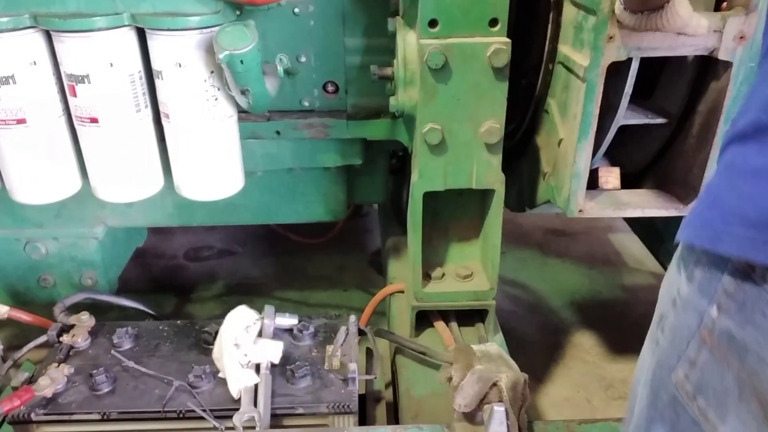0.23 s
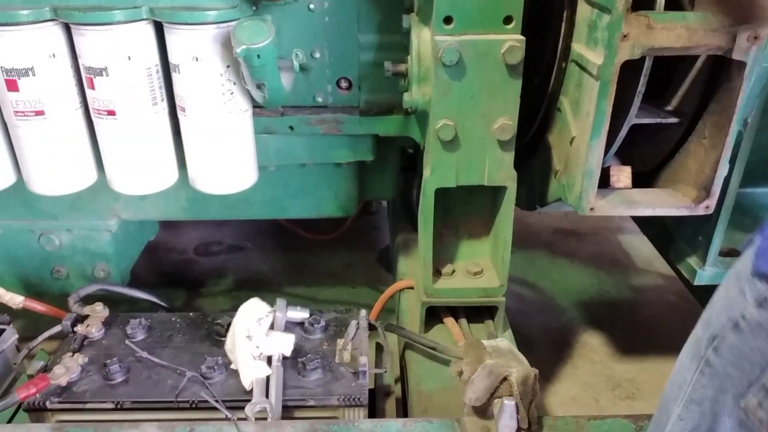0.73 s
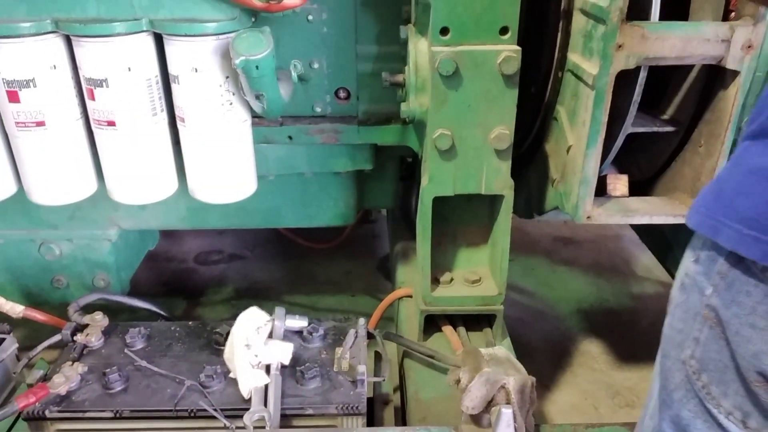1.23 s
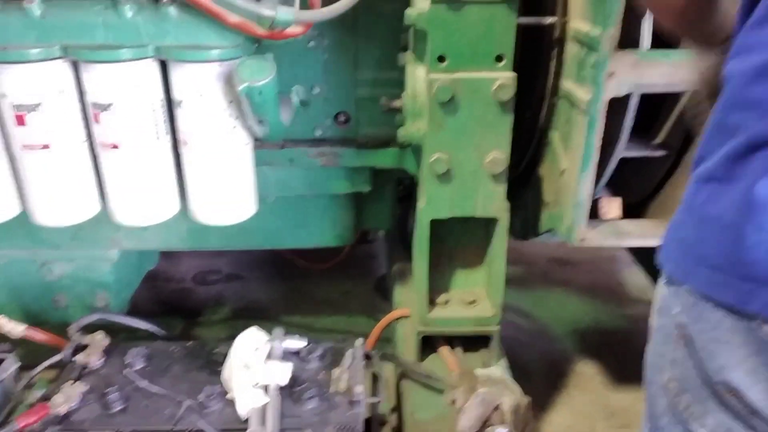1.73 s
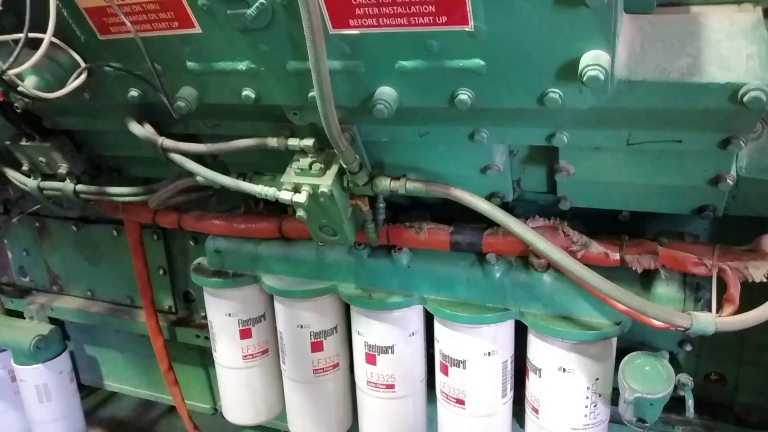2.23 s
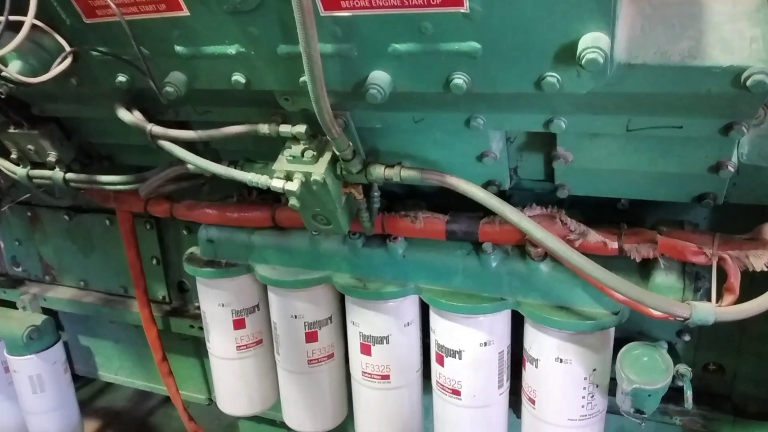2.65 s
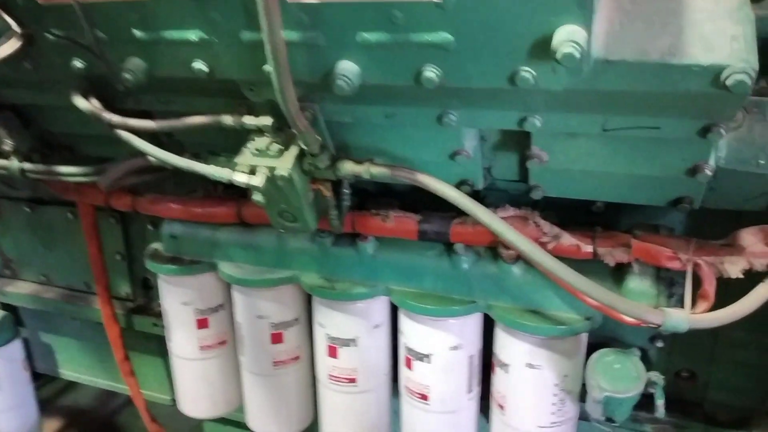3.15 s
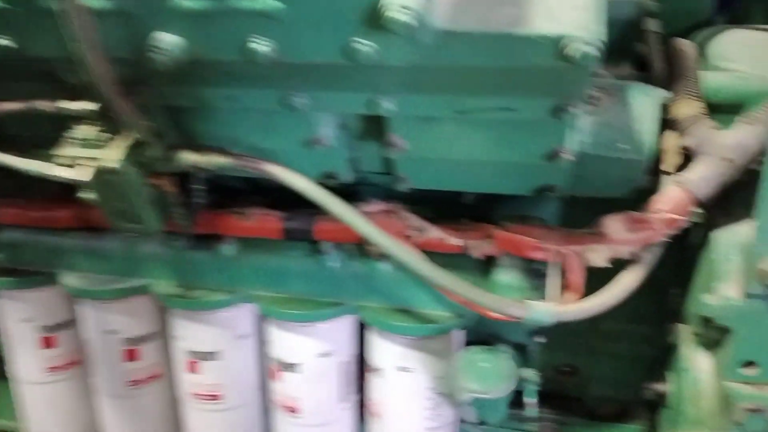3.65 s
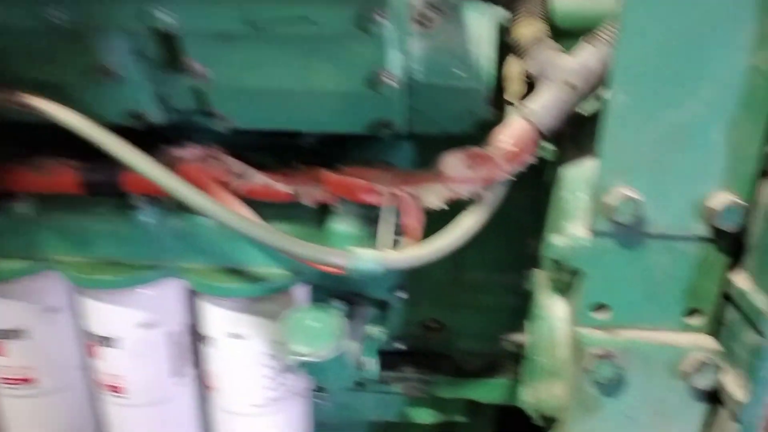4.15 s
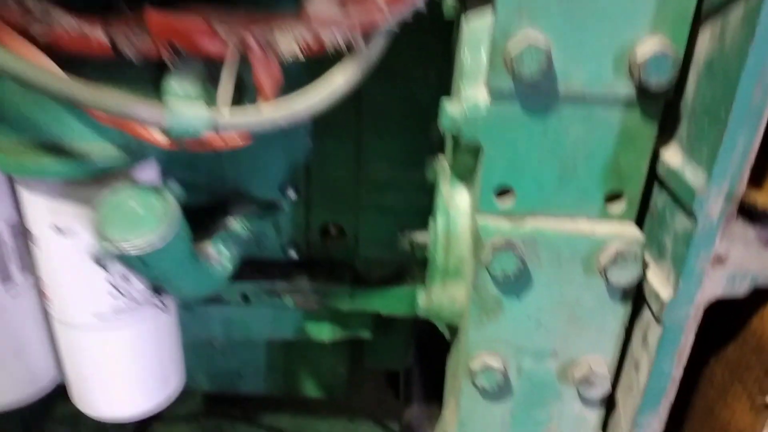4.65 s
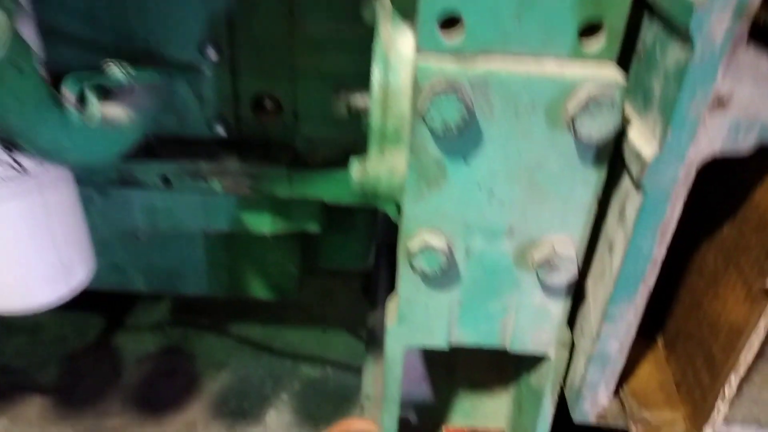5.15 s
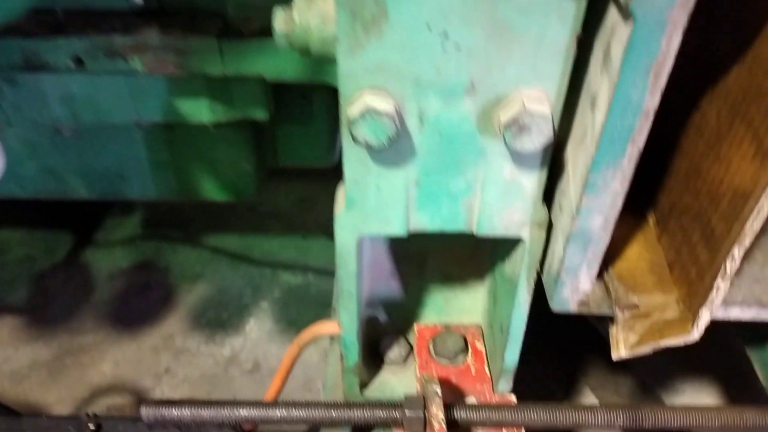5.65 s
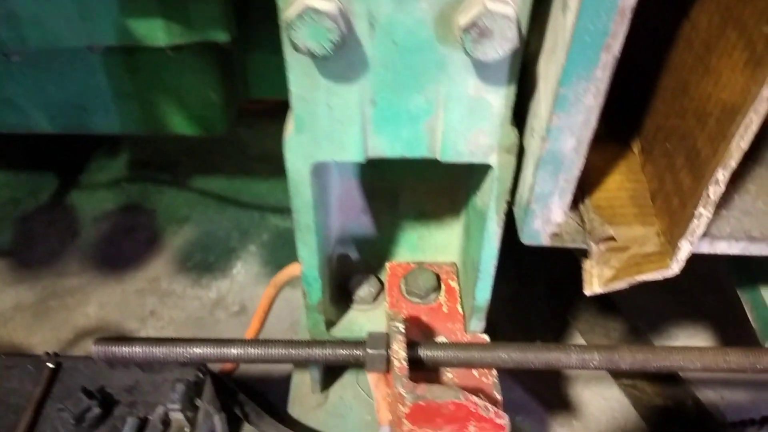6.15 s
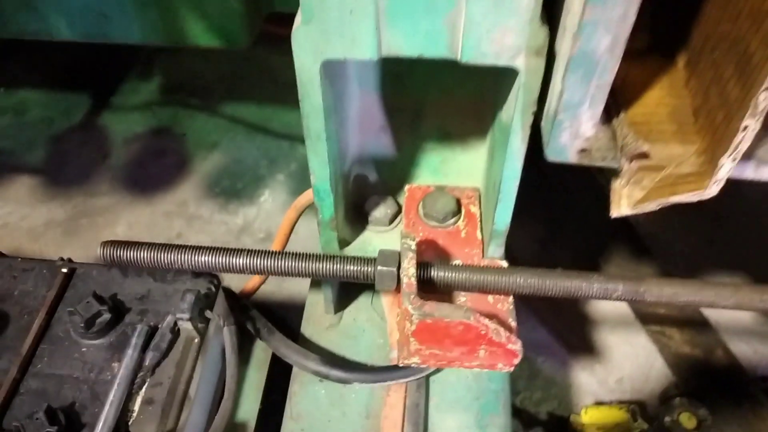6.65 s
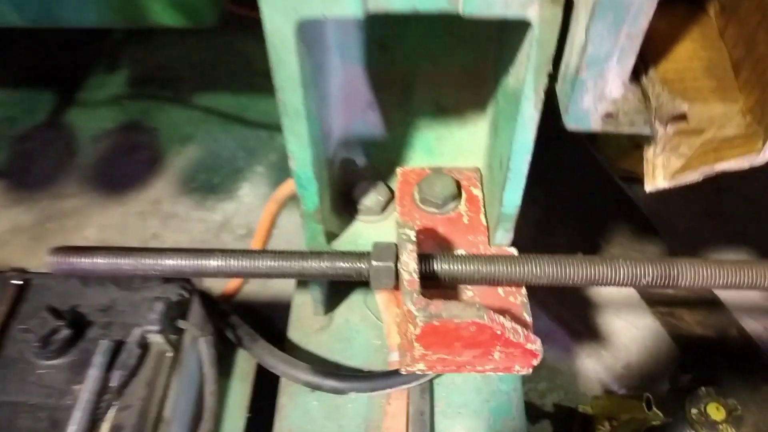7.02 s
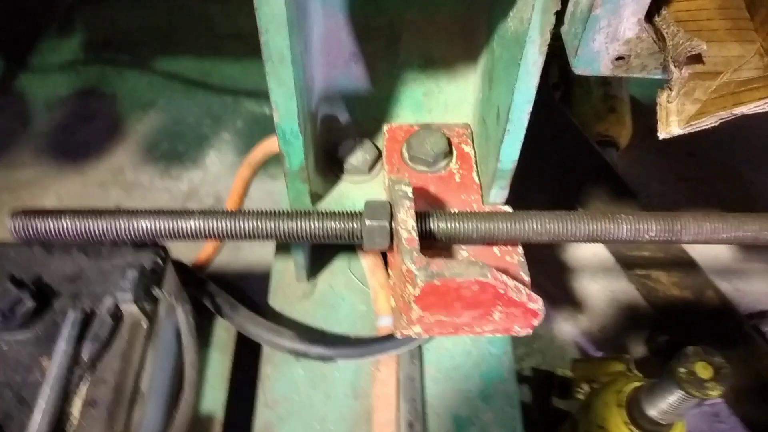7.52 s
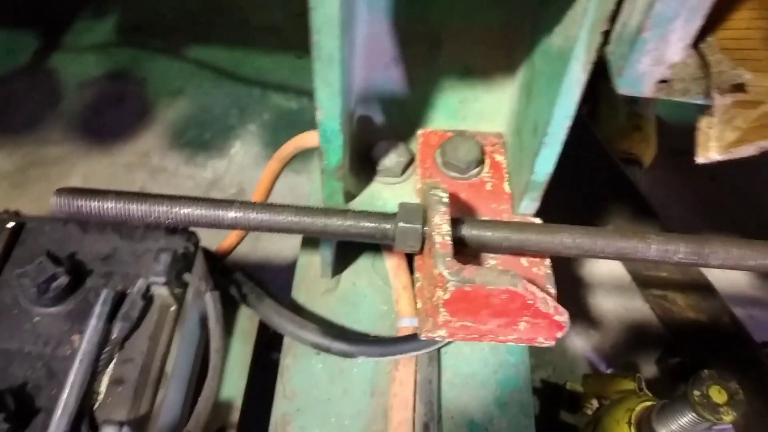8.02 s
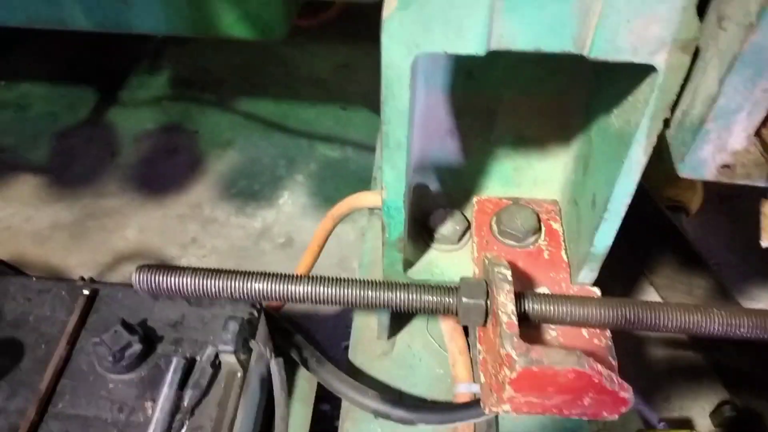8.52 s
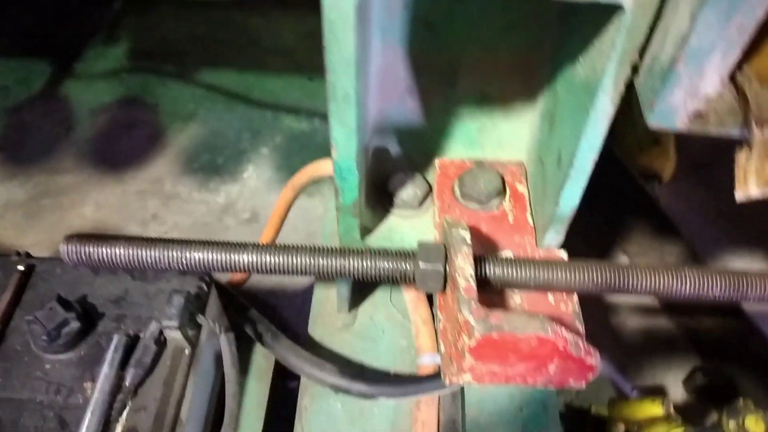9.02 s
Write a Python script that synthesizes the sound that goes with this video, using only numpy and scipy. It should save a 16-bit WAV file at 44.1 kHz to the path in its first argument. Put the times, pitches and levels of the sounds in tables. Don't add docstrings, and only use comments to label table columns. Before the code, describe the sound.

Loud, constant diesel engine roar with rapid knocking, low hum and high whine; it drops out briefly near two seconds, then fades back in.

```python
import sys
import numpy as np
from scipy import signal
from scipy.fft import rfft, irfft
from scipy.io import wavfile
from scipy.ndimage import map_coordinates

SR = 44100
rng = np.random.default_rng(int(sys.argv[2]) if len(sys.argv) > 2 else 0)


def store_pcm(level_fs):
    pcm = np.round(np.clip(level_fs, -1, 1) * 32767).astype(np.int16)
    wavfile.write(sys.argv[1], SR, np.atleast_2d(pcm).T)


def makeup_ratio(level_db):
    decades = np.asarray(level_db, float) / 20
    return 10 ** decades


N = 409248
T = np.arange(N) / SR
HZ = np.arange(N // 2 + 1) * SR / N

CYCLE_HZ = 12.498
CUT_S, BACK_S, FADE_S = 1.8797, 2.2238, 0.22
PORT_GAP_M, SOUND_M_S = 0.152, 343
LEFT_LATE_S = 0.00021
GLANCE_S, GLANCE_WIDTH_S, GLANCE_DB = 2.65, 0.09, 3.5

# f/Hz, density level/dB
ROAR_SPECTRUM = [(12, -56), (20, -9.5), (38, -19), (74, 0), (190, -3), (341, -6), (371, -6.5), (504, -10.5),
                 (808, -10), (1100, -15), (3730, -18.5), (5070, -19.5), (6330, -22.5), (7690, -23),
                 (15400, -29)]
# f/Hz, level against the roar/dB
CLATTER_SHARE = [(40, -5), (100, -3), (350, -6), (700, -2.5), (1500, 1.5), (2200, 1), (3500, -21),
                 (8000, -11.5)]
# f/Hz, width/Hz, level/dB
CASING_MODES = [(1496, 52, 5), (1680, 81, 2), (1870, 170, 2), (2120, 130, -2), (2200, 150, 3),
                (800, 90, -0.5)]
# f/Hz, width/Hz, level/dB
PANEL_MODES = [(3340, 270, 2.5), (2250, 250, -3.5), (3800, 700, -1.5)]
# level at the first place/dB, by the cylinders/dB, by the frame/dB
LAYER_LEVELS = [
    (-1.6, -2, 1.53),
    (-0.1, 0.5, .3),
    (0.4, 0.4, -0.072),
    (0.5, 0.2, 0.53),
]
LAYER_SWAY = (1.03, 0.36, 0.13, 0.9)
# order/cycle, level at the first place/dB, by the cylinders/dB, by the frame/dB, unsteadiness/dB
ENGINE_ORDERS = [(6, -24.5, -34.5, -36, 4.5), (7, -39.5, -32.5, -26, 0), (9, -29, -42, -25.5, 3.5),
                 (11, -41, -32, -40, 0.5), (12, -29.5, -29, -27.5, -0.5), (14, -30, -34.5, -25.5, 1.5),
                 (16, -24, -38, -26.5, 2.5), (18, -48, -41, -32.5, 7), (22, -37.5, -31, -29, 1.5),
                 (28, -52, -34, -37, 2), (30, -22, -21, -20, .5), (33, -35.5, -27.5, -35, -1.5),
                 (37, -39, -33.5, -34.5, 1), (44, -33, -39.5, -39, 2.5), (55, -31, -34.5, -35, 2.5),
                 (63.1, -33, -45, -42.5, 2.5), (64.35, -45, -47, -34.5, -4), (74, -47.5, -40, -42, 1),
                 (96.7, -38, -41, -51, 2), (120, -52.5, -48, -53.5, -4), (140.5, -35.5, -33.5, -53, 1.5),
                 (149.7, -32, -31, -43, 0), (260, -38.5, -59.5, -61.5, 4)]
# order/cycle, t/s, width/s, level/dB
STANDING_WAVES = [(30, 4.8, .45, -13), (37, 3.55, 0.83, 11.5), (55, 1.13, 0.84, 7.5), (260, 1.1, .2, 8),
                  (55, 5.6, .3, 9), (44, 3.55, 0.56, 11), (44, 5.6, 0.46, 11.5), (16, 5.7, .3, 8),
                  (14, 5.1, .3, 7), (74, 3.5, .3, 9), (64, 6.0, 0.54, 6.5)]
# t/s, f/Hz
BLADE_RATE = [(0, 4991), (.53, 4992), (.94, 5001), (1.87, 4994), (2.3, 4941), (2.75, 4936), (3.5, 4958),
              (4.0, 4943), (4.4, 4950), (4.85, 4946), (5.6, 4956), (6.1, 4957), (6.65, 4937), (7.1, 4935),
              (7.5, 4948), (7.8, 4947), (8.6, 4931), (9.28, 4931)]
# level at the first place/dB, by the cylinders/dB, by the frame/dB
WHISTLE_LEVELS = (-31, -32, -31.5)
# t/s, width/s, level/dB
PORTS_FACING = [(.06, .08, 8.5), (.38, 0.1, 8), (.95, .3, 1), (1.6, .3, -5.5), (2.65, .13, 5.5),
                (4.45, .15, 6.5), (3.18, .13, 4), (5.15, .22, 4), (5.9, .1, -12), (6.63, .1, 3),
                (8.7, .3, -8)]
# t/s, delay/half waves
WHISTLE_TILT = [(0, 0), (1.15, 0), (1.4, 1), (1.9, 1), (2.2, 0), (9.28, 0)]
# t/s, share of the way/1
WALK_PATH = [(2.3, 0), (3.3, 0.25), (4.2, .45), (5.2, 0.76), (6.0, 1), (9.28, 1)]
# f/Hz, width/Hz, level/dB
PORT_MODES = [
    [(7740, 2070, 9.5), (4300, 480, 2.5)],
    [(10540, 3740, 8.5), (6500, 2800, -1.5)],
]


def clatter(dwell_s, count):
    size = int(SR / CYCLE_HZ)
    patterns = rng.standard_normal((count, size))
    angle = (T * CYCLE_HZ % 1 * size).astype(int)
    jump = 3 * (T > CUT_S)
    place = np.minimum((T / dwell_s + jump) % (count - 1), count - 1)
    k = place.astype(int)
    turn = (place - k) * np.pi / 2
    return np.cos(turn) * patterns[k, angle] + np.sin(turn) * patterns[k + 1, angle]


def roar_spectrum():
    noise = rfft(rng.standard_normal(N))
    return noise + makeup_ratio(colour_db(CLATTER_SHARE)) * rfft(clatter(1.333, count=16))


def roar_and_clatter():
    mid, side = roar_spectrum(), roar_spectrum()
    alike = np.clip(np.sinc(2 * HZ * PORT_GAP_M / SOUND_M_S), -0.99, 0.985)
    pair = np.sqrt(1 + alike) * mid + np.sqrt(1 - alike) * side * np.array([[1], [-1]])
    pair = pair * makeup_ratio(colour_db(ROAR_SPECTRUM) + peaks_db(CASING_MODES))
    out = irfft(pair * (makeup_ratio(peaks_db(PANEL_MODES)) - 1), N) * (T < CUT_S)
    centres = np.log([110.0, 500.0, 2200.0, 8000.0])
    flutter_db = (0.42, 0.48, 0.55, 0.65)
    glance_db = GLANCE_DB * bump(GLANCE_S, GLANCE_WIDTH_S)
    for k, place_db in enumerate(LAYER_LEVELS):
        share = np.interp(np.log(HZ + 1), centres, np.eye(4)[k])
        db = by_place(*place_db) + LAYER_SWAY[k] * walk(3.5) + flutter_db[k] * walk(10)
        if k > 1:
            db = db + glance_db
        out = out + irfft(pair * share, N) * makeup_ratio(db)
    out = patchy(out, patchy_db=1.3, width_hz=361.0, hold_s=0.09)
    return out * makeup_ratio(-9.5) / out.std()


def hum():
    out = 0
    for order, *place_db, unsteady_db in ENGINE_ORDERS:
        line = round(order)
        db = by_place(*place_db) + unsteady_db * walk(1.2)
        for node_order, s, width_s, swing_db in STANDING_WAVES:
            if round(node_order) == line:
                db = db + swing_db * bump(s, width_s)
        start = 2 * np.pi * rng.random() + 0.23 * walk(3)
        late_s = LEFT_LATE_S * (1 + 0.3 * rng.standard_normal())
        lag = 2 * np.pi * line * CYCLE_HZ * late_s * np.array([[-0.5], [0.5]])
        out = out + makeup_ratio(db + 4.5) * np.sin(2 * np.pi * line * CYCLE_HZ * T + start + lag)
    return out


def flutter():
    return 0.72 + 0.73 * (walk(26) + 1j * walk(26))


def turbo():
    db = by_place(*WHISTLE_LEVELS)
    for s, width_s, turn_db in PORTS_FACING:
        db = db + turn_db * bump(s, width_s)
    turn = np.exp(2j * np.pi * np.cumsum(track(BLADE_RATE)) / SR)
    late = np.exp(1j * np.pi * track(WHISTLE_TILT))
    out = []
    for octave_db, port in ((-49, 0.96), (-40.5, late)):
        whistle = makeup_ratio(db + 2.0) * flutter() * port * turn
        octave = makeup_ratio(octave_db) * flutter() * turn ** 2
        out.append((whistle + octave).imag)
    return np.array(out)


def patchy(x, patchy_db, width_hz, hold_s):
    hz, s, z = signal.stft(x, SR, nperseg=1024)
    short = np.clip(hz / 900, 0, 1)[:, None] ** 2
    field = rng.standard_normal((64, 256))
    where = np.meshgrid(np.minimum(hz / width_hz, 62), np.minimum(s / hold_s, 254), indexing="ij")
    gain = makeup_ratio(patchy_db * short * map_coordinates(field, where, order=1))
    return signal.istft(z * gain, SR)[1][:, :N]


def by_place(first, cylinders, frame):
    way = np.clip(track(WALK_PATH), 0, 1)
    return np.where(T < CUT_S, first, cylinders + (frame - cylinders) * way)


def peaks_db(modes):
    return sum(db / (1 + (2 * (HZ - hz) / width) ** 2) for hz, width, db in modes)


def colour_db(points):
    hz, db = np.transpose(points)
    return np.interp(np.log(HZ + 1), np.log(hz), db)


def track(points):
    s, value = np.transpose(points)
    return np.interp(T, s, value)


def walk(rate):
    count = int(N / SR * rate) + 2
    return 1.06 * np.interp(T * rate, np.arange(count), rng.standard_normal(count))


def bump(s, width_s):
    return np.exp(-((T - s) / width_s) ** 2)


def scene():
    return roar_and_clatter() + hum() + turbo()


def band_limit(x):
    return signal.sosfilt(signal.butter(12, 15160, fs=SR, output="sos"), x)


def record(dry):
    squashed = 0.855 * np.tanh(1.273 * dry / 0.83)
    ported = irfft(rfft(squashed) * makeup_ratio([peaks_db(modes) for modes in PORT_MODES]), N)
    after_s = np.maximum(T - CUT_S, 0)
    tail = makeup_ratio(-18 - 2500 * after_s) * (after_s < 0.015)
    fade = (T > BACK_S) * np.clip(0.05 + (T - BACK_S) / FADE_S, 0, 1)
    gate = np.where(T < CUT_S, 1, tail) + fade
    return band_limit(np.clip(ported, -1, 1) * gate)


dry = scene()
out = record(dry)
store_pcm(out)
```